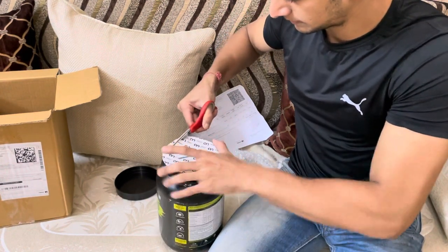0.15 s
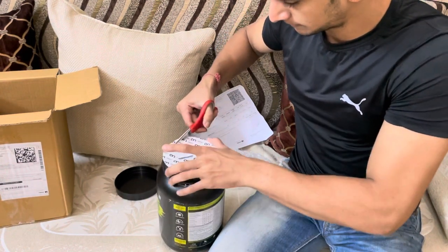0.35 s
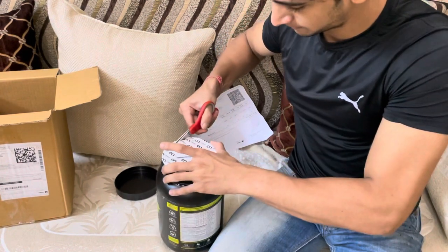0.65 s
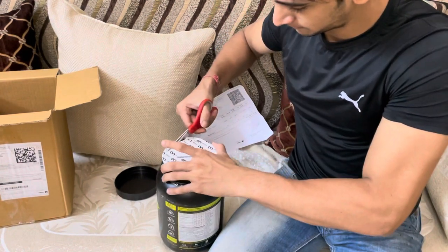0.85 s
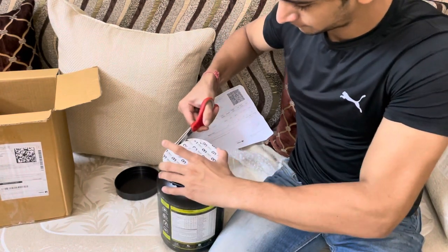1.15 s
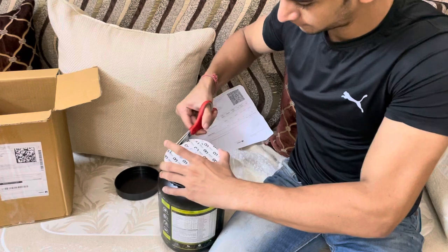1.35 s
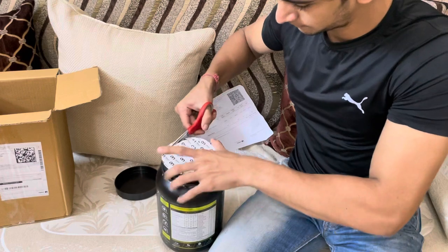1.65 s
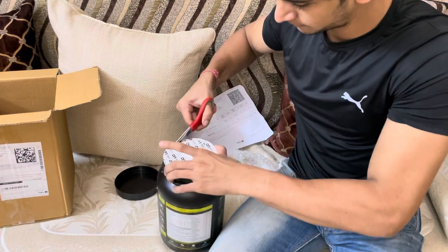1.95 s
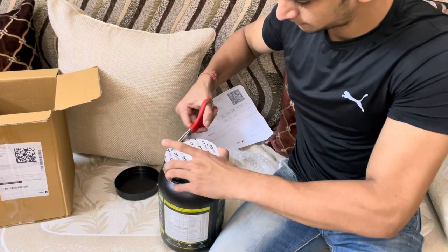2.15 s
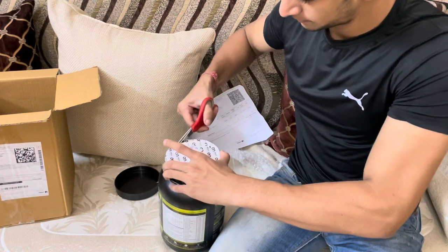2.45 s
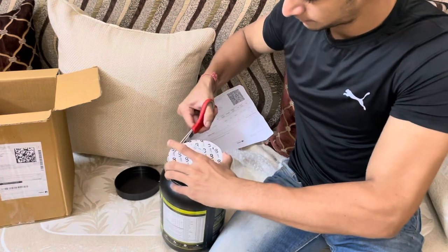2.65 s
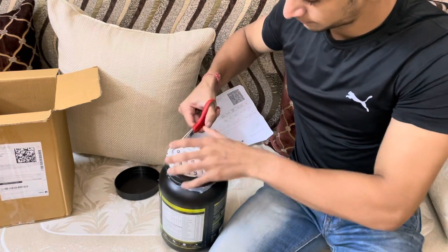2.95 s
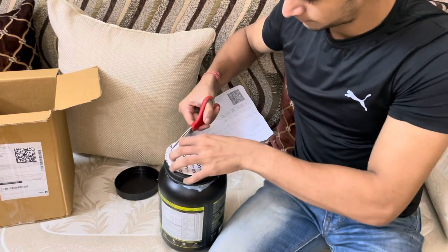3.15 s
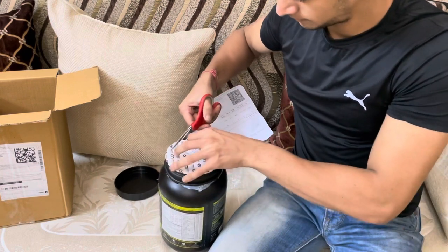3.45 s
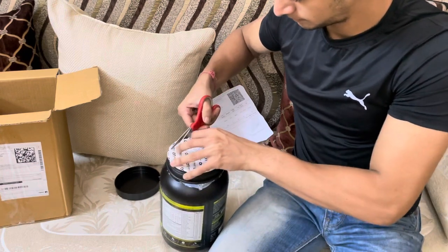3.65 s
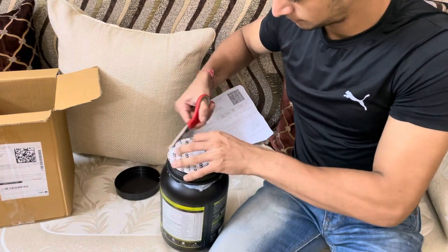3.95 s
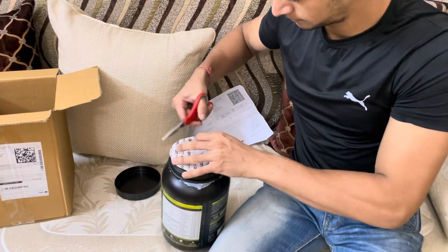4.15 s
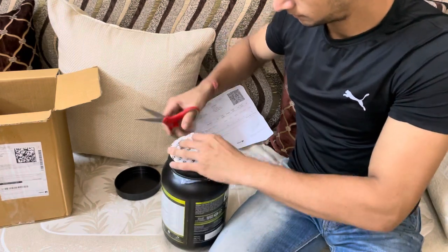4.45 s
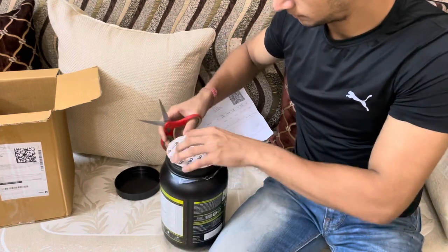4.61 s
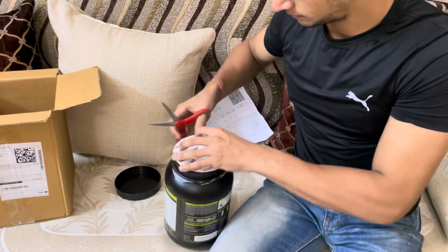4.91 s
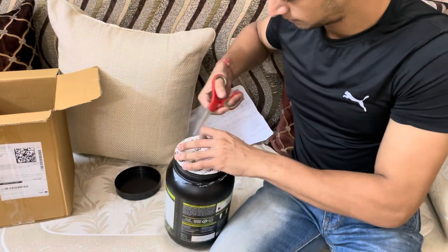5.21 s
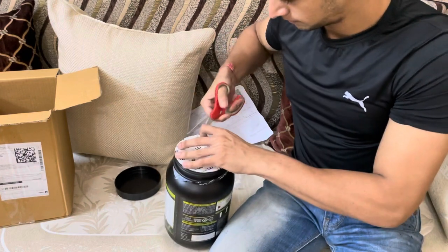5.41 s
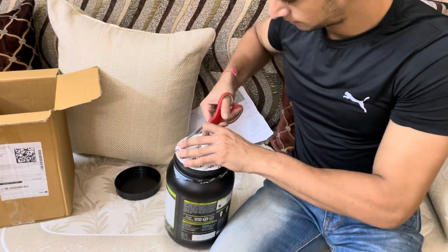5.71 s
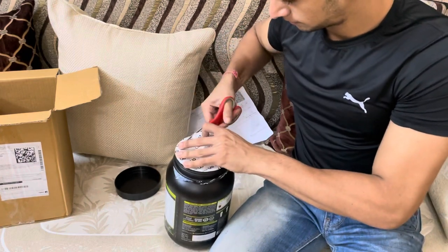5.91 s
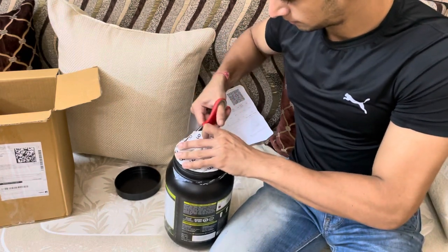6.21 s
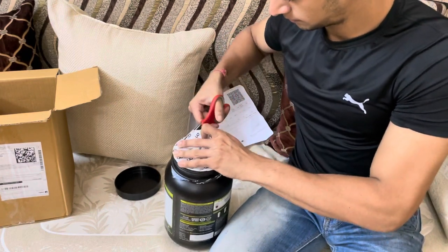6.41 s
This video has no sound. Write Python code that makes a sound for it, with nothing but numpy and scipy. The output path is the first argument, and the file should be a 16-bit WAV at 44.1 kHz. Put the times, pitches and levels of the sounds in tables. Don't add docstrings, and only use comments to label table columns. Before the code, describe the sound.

Close up, scissors work around the foil seal of a hollow plastic tub. Thin crinkles and dry rustles come in uneven bursts, with taut, drum-like bumps beneath. Two crisp snips fall around two and a half seconds, then metal blades click. Near four seconds the seal gives a loud hollow pop. Lighter scraping follows, then sharp snaps near the end. Quiet living room, faint traffic rumble, handheld stereo microphone.

```python
import sys
import numpy as np
from scipy import signal
from scipy.fft import rfft, irfft, next_fast_len
from scipy.io import wavfile
from scipy.ndimage import uniform_filter1d

SR = 44100
rng = np.random.default_rng(int(sys.argv[2]) if len(sys.argv) > 2 else 0)


def wav_record(signal):
    frames = np.transpose(np.atleast_2d(signal))
    bounded = np.clip(frames, -1, 1)
    quanta = np.round(bounded * 32767).astype(np.int16)
    wavfile.write(sys.argv[1], SR, quanta)


def volts_from_decibels(level):
    exponent = np.asarray(level, float) / 20
    return 10 ** exponent


N = 289737
SIZE = next_fast_len(N + SR)
HZ = np.arange(SIZE // 2 + 1) * SR / SIZE

# start in [s], peak in [dB],
# rim answer in [dB re peak], pitch as [ratio to kind].
CREASE_SNAPS = [(0.0836, -39, 11, 1.02), (0.223, -40, 7.5, 1.02), (0.3635, -31, 2, 1.02),
                (0.823, -39.5, 4, 1.02), (1.229, -38.5, 5, 1.02), (1.458, -45.5, -23, 1.02),
                (1.8489, -27.5, 4, 1.02), (2.073, -45, -6, 1.02), (2.2317, -39, 9, 1.02),
                (2.4344, -29, -7, 1.02), (2.6294, -49, -14, 1.02), (2.749, -38, -24, 1.02),
                (2.821, -39, 11, 1.05), (2.865, -34, -10, 1.08), (2.874, -45, 14, 1.02),
                (2.9985, -45, -21, 1.02), (2.677, -47.5, 7, 1.02), (2.696, -50, 3, 1.02),
                (2.717, -55, -12.5, 1.1), (3.097, -49.5, -6, 1.02), (3.8262, -54, -14.5, 1.02),
                (3.876, -41, -4, 1.02), (3.8938, -24.5, -35.5, 1.08), (3.8965, -24, -1, 1.12),
                (4.4466, -54, -25, 1.02), (4.7146, -42, -23, 1.02), (4.852, -32, -35, 1.02),
                (5.2105, -50, 8, 1.02), (5.635, -36.5, -17, 1.02), (5.784, -33, 14, 1.02),
                (6.204, -17.5, 4, 1.02), (6.2072, -27, 8.5, 1.02), (6.2005, -39, 6, 1.02)]
# start in [s], peak in [dB],
# rim answer in [dB re peak], pitch as [ratio to kind].
FOLD_SNAPS = [(0.3837, -46, 5, .8), (0.4564, -43, 5, .7), (0.5405, -44, 17, .8), (0.5927, -47, 5, .8),
              (0.5989, -44, 8, .8), (0.6084, -30, -6, 1.05), (0.966, -29, 2, 1.05), (0.972, -34, 8, 1.05),
              (1.0065, -50, 8, .6), (1.258, -39, 7, .8), (1.3542, -33.5, 5.5, 1.05),
              (1.5339, -28, -11, 1.15), (2.0965, -53, 5, 1.05), (2.569, -43.5, -10, 1.2),
              (2.8675, -42, 12, .7), (2.9987, -43, 2, 1.2), (3.0439, -48, 6, .7), (3.1569, -48, 14, 1.05),
              (3.5666, -57, -4, 1.05), (3.582, -32, -8, 1.05), (3.593, -49, 1, 1.05),
              (3.6177, -34, 9, 1.05), (3.88, -39, 13, .8), (4.464, -42, 13, 1.05), (4.49, -52, 14, .6),
              (4.574, -55, 18, .6), (4.7, -53.5, 12, .6), (5.3611, -44.5, 17.5, .7), (5.418, -55, 5, 1.05),
              (5.661, -50, 22, .55), (6.038, -35, -16, 1.05), (6.1434, -45, -5, 1.05),
              (6.151, -26, 8, 1.05), (6.4317, -60, 10, 1.05)]
# start in [s], peak in [dB],
# rim answer in [dB re peak], pitch as [ratio to kind].
CUT_SNAPS = [(0.398, -30, -12, .9), (1.0014, -56, -10, .9), (1.183, -47, -18, 1.05),
             (1.338, -54, -12, 1.05), (2.7394, -23, -5, .68), (2.8645, -39, -11, .9),
             (2.977, -49, -25, 1.3), (2.989, -49, -25, 1.3), (3.5302, -41, 12, 1.05),
             (3.8989, -18.5, -22, .95), (5.7878, -23.5, -16, 1.05), (5.7894, -20.5, 7, 1.05),
             (5.8134, -46, -15, 1.05), (2.7425, -36, -7, .7), (2.87, -34, -5, .7)]
# start in [s], peak in [dB],
# rim answer in [dB re peak], pitch as [ratio to kind].
SNIP_SNAPS = [
    (2.4303, -16, -13, 1.02),
    (2.7386, -20.5, -19, 1.05),
]
# frequency in [Hz], density in [dB per Hz].
FOIL_SPECTRUM = [(3000, -14), (4700, -2), (6000, -6), (8000, -2.5), (10000, 0), (12000, -.5), (13200, -7),
                 (14500, -18), (16000, -21)]
# frequency in [Hz], density in [dB per Hz].
RIM_SPECTRUM = [(500, 1), (1000, -4.5), (1500, 3.5), (2400, 2.5), (3500, 0), (4300, 1), (6500, -17)]
# firmest contact in [s], foil level in [dB],
# rim level in [dB re foil], hollow body level in [dB re foil], fade time in [s].
RUB_STROKES = [(0.0, -60.5, 0, -27, 0.11), (0.1, -75.5, 6, 18.5, 0.2), (0.3, -64.5, -5, -7, 0.44),
               (0.45, -66, 7, 10, 0.076), (0.992, -61.5, 0.5, 2, 0.3), (1.32, -83, 16, 24.5, 0.071),
               (1.62, -70, 0, -27, 0.22), (1.9, -64, -1.5, 4.5, 0.34), (2.101, -78.5, 0, 35.5, 0.055),
               (2.232, -64.5, 2.5, 2.5, 0.18), (2.689, -66.5, -0.5, 2, 0.36), (2.84, -69.5, -9, 11.5, 0.11),
               (3.24, -66, 3, -1, 0.047), (3.42, -79, -11, -24, 0.24), (3.923, -61, 1, 22.5, 0.15),
               (4.249, -63, 0.5, -3.5, 0.41), (4.67, -74, 2.5, 9, 0.32), (4.865, -69, -3, -9, 0.21),
               (5.428, -84.5, 10, 27.5, 0.081), (5.62, -86, 6, -5, 0.12), (6.02, -65, 2, 9, 0.24),
               (6.17, -87, 4, 17, 0.086), (6.461, -64, 4.5, 4.5, 0.33)]
# centre in [s], bright level in [dB],
# dull level in [dB], body level in [dB], half length in [s].
FOLD_CRUNCHES = [(0.1, -66, -66, -85, 0.029), (0.395, -49, -53, -53.5, 0.029),
                 (0.544, -51.5, -46.5, -43, 0.005), (0.602, -49, -46.5, -77, 0.018),
                 (0.844, -60, -54, -49.5, 0.028), (1.008, -53, -48, -54, 0.0045),
                 (1.039, -64, -59, -56, 0.03), (4.663, -76, -68, -58, 0.047), (5.15, -74, -77, -80, 0.064),
                 (1.271, -53.5, -50, -45, 0.021), (1.525, -57.5, -67, -69, 0.033),
                 (2.1, -56.5, -52, -70, 0.024), (2.494, -60, -54, -45, 0.029),
                 (2.782, -55, -69, -76, 0.028), (2.869, -54, -56, -61, 0.005),
                 (3.187, -71.5, -65, -61, 0.036), (3.595, -51, -49.5, -42, 0.024),
                 (3.898, -34.5, -31.5, -27, 0.0029), (4.476, -63, -63.5, -49, 0.017),
                 (4.593, -71, -72, -66, 0.041), (4.912, -67, -63.5, -73, 0.068),
                 (3.931, -55, -49, -46, 0.032), (0.453, -72, -61, -59.5, 0.028),
                 (5.83, -61, -51, -52.5, 0.032), (1.56, -73, -67, -67, 0.031),
                 (5.463, -80, -69, -58, 0.016), (4.706, -70, -68.5, -60, 0.0072),
                 (5.234, -69.5, -75, -89, 0.022), (5.424, -56.5, -59, -47, 0.017),
                 (5.632, -66, -63, -65.5, 0.064), (5.79, -41, -39.5, -46, 0.0054),
                 (6.054, -80, -63.5, -48.5, 0.029), (6.149, -53, -49.5, -49, 0.0086),
                 (6.209, -52, -50.5, -58, 0.039)]
# frequency in [Hz], width in [Hz], level in [dB].
TUB_MODES = [(310, 85, 1.5), (468, 37, -3), (487.5, 45.6, -3), (690, 104, -7.5), (783, 103, -11),
             (960, 54, -14), (1092, 62, -15.5), (1567, 33, -17.5)]
# start in [s], peak in [dB], pitch in [Hz],
# knock on the tub in [dB re peak], t60 in [s].
SEAL_TUGS = [(0.129, -40.5, 266, 5, 0.02), (0.5476, -32.5, 310, 0.5, 0.026), (0.603, -31, 298, -12, 0.1),
             (0.841, -37.5, 298, -19, 0.047), (1.008, -23.5, 267, -14, 0.028),
             (1.2715, -35.5, 285, 0, 0.067), (1.855, -38, 266, -4, 0.025), (2.105, -39.5, 246, -33, 0.18),
             (2.238, -37.5, 314.5, -4.5, 0.12), (2.481, -23.5, 310, -12, 0.048),
             (2.509, -26, 273, -9, 0.053), (3.155, -40, 282, 3.5, 0.036), (3.586, -39, 228, 0, 0.13),
             (3.917, -39, 297, -18, 0.11), (4.465, -34, 359, -15, 0.02), (4.577, -36, 215, -9, 0.019),
             (4.682, -37.5, 362, -21, 0.077), (4.702, -40, 341, -23, 0.069), (4.629, -45, 333, -15, 0.14),
             (5.361, -47, 296, 5.5, 0.36), (5.398, -33.5, 310, -4, 0.024), (5.661, -35.5, 280, -4.5, 0.019),
             (5.794, -41, 288, 2, 0.02), (6.039, -46, 415, 8, 0.055), (6.153, -40.5, 310, -2, 0.014),
             (6.203, -35.5, 355, 4.5, 0.018), (1.2592, -27.5, 296, -12, 0.045),
             (1.033, -39.5, 268, -6, .08), (2.468, -33.5, 297, -12, 0.11), (2.504, -33.5, 298, -4, 0.04),
             (5.39, -37, 292, -14, .03), (5.411, -39.5, 333, 6.5, 0.073)]
# start in [s], peak in [dB].
CUSHION_THUDS = [(0.549, -44), (0.598, -51), (0.841, -48), (1.01, -47.5), (1.27, -44.5), (2.103, -48.5),
                 (2.24, -51), (2.481, -48), (2.51, -49), (3.153, -68), (3.531, -63), (3.897, -39.5),
                 (5.792, -53.5)]
# start in [s], pitch in [Hz], peak in [dB], swell time in [s].
SEAL_SWINGS = [
    (0.5483, 303, -16.5, 0.0061),
    (1.2703, 296, -29, .01),
    (5.7901, 296, -21.5, 0.0084),
    (6.1522, 307, -30.5, 0.0054),
    (6.2045, 333, -37, 0.0034),
    (2.519, 290, -34.5, 0.0062),
    (2.4895, 324, -32, 0.0052),
]
# start in [s], pitch in [Hz], peak in [dB], t60 in [s].
POP_MODES = [
    (3.8964, 645, -11.5, .021),
    (3.8975, 312, -9, .035),
    (3.8995, 430, -19, .022),
    (3.8985, 1090, -24, .016),
    (3.8955, 1637, -29, .012),
    (3.8955, 2250, -30, .01),
    (3.8955, 520, -19, .012),
    (3.897, 850, -25, .014),
]
# start in [s], pitch in [Hz], peak in [dB], t60 in [s].
RIM_TAPS = [(3.0445, 544, -48.5, 0.017), (3.0445, 1210, -47.5, 0.01), (3.567, 1400, -44.5, 0.017),
            (6.5, 720, -52, 0.014), (2.49, 630, -44, 0.038), (5.7925, 2320, -30, 0.011),
            (5.792, 467, -27.5, 0.013), (5.787, 2600, -37, 0.0045), (5.799, 2360, -40, 0.011),
            (5.801, 1570, -45, .015), (0.0822, 1400, -45.5, .008), (0.084, 2550, -48, 0.0065),
            (2.0975, 1580, -39.5, 0.0085), (1.2572, 1780, -36, 0.0043), (1.1, 3300, -46, 0.0028),
            (2.8, 1600, -44, .012), (2.8, 1500, -46, 0.0072), (2.7, 581, -40, 0.01),
            (0.5478, 630, -29.5, 0.0094), (5.7915, 640, -34, .008), (3.912, 1090, -37, 0.055),
            (5.418, 790, -39, 0.025), (6.045, 900, -49.5, 0.026), (0.459, 1970, -42, 0.0085),
            (2.821, 1900, -56, .008), (6.2065, 2600, -33, 0.0055), (4.64, 1500, -58, .03),
            (4.572, 1330, -48.5, 0.012), (4.698, 1200, -55, .015)]
# frequency in [Hz], level in [dB], t60 in [s].
BLADE_MODES = [(1090, -19, 5.0), (1640, 4.5, 0.49), (2340, 3, 5.0), (2400, -2.5, 0.13), (2820, -10, 0.61),
               (3240, -2, 0.13)]
# start in [s], peak in [dB].
BLADE_CLACKS = [
    (2.822, -47),
    (3.0446, -49),
    (3.1541, -35),
    (3.1569, -30),
    (3.166, -44),
    (6.1509, -31.5),
]
# frequency in [Hz], t60 in [s].
ECHO_T60 = [(100, 0.47), (300, 0.31), (1000, 0.31), (4000, 0.32), (12000, 0.24)]
# frequency in [Hz], level in [dB].
ECHO_LEVEL = [(100, 5.5), (210, 4), (300, -7.5), (450, 3.5), (700, 2.5), (1500, 4), (2450, 1), (3500, 4),
              (12000, -2.5)]
# frequency in [Hz], likeness of diffuse sound in [0-1],
# left lead in [radians], left-right balance in [dB].
MIC_PORTS = [(0, .99, 0, .7), (80, .9, 0, 1.9), (350, .75, .15, 2.6), (550, .4, .1, 5.5),
             (800, .2, -.2, 4.5), (1500, .3, .1, 2.5), (2400, .6, .6, 2.5), (3200, .55, 1.3, 3.5),
             (5200, .3, 1.1, 5.5), (5700, .2, -.9, 3.5), (7000, .4, -1.9, 3.5), (7700, .88, -2.75, .6),
             (8500, .93, -3.14, 0), (9400, .88, -3.55, -.2), (11000, .62, -4.55, -.6),
             (12700, .85, -5.8, -.6), (16000, .94, -6.28, 0)]
# frequency in [Hz], level in [dB rms], left lead in [radians],
# left-right balance in [dB].
WHINE_TONES = [(1698.5, -67, -1.8, -1.2), (8495, -80, np.pi, 0)]
# time in [s], level in [dB].
TRAFFIC_SWELL = [(0.0, -54), (0.86, -55.5), (1.9, -56.5), (2.1, -52.5), (2.87, -57.5), (3.15, -54),
                 (3.92, -55), (4.32, -56.5), (4.83, -53.5), (5.2, -56), (5.95, -54.5), (6.57, -54)]
# frequency in [Hz], density in [dB per Hz].
RUMBLE_SPECTRUM = [(24, -41.5), (40, 0.5), (80, 2), (220, -6.5), (377, -20.5), (737, -29), (1300, -42.5),
                   (1690, -93.5), (2860, -120)]
# frequency in [Hz], density in [dB per Hz].
HISS_SPECTRUM = [(500, -7), (1200, 6), (2400, 4), (4000, -3.5), (5600, -18), (8000, 6.5), (12000, -3),
                 (13500, -21.5), (15000, -49)]

CREASE_HZ, CREASE_FLIP_S, CREASE_CRACK = 10030, 0.0018, 0.13
FOLD_HZ, FOLD_FLIP_S, FOLD_CRACK = 3180, 0.00084, 1
CUT_HZ, CUT_FLIP_S, CUT_CRACK = 6900, 0.0014, 0.34
SNIP_HZ, SNIP_FLIP_S, SNIP_CRACK = 11500, 0.0005, 0.4
STROKE_FADE_DB, STROKE_RISE_SHARE = 22.5, 0.33
TUG_RISE_S, WALL_HZ = 0.006, 630
CUSHION_HZ, CUSHION_T60_S = 130, 0.24
SWING_SHARPNESS, SLACK_CYCLES, SLACK_S = 2.2, 0.28, 0.0015
POP_RISE_CYCLES = 0.8
POP_DAMPING = 1.63
FIRST_ECHO_S = 0.0032
BOUNCE_S, BOUNCE_DB, BOUNCE_FROM_HZ = 0.0006, -9, 3700
HISS_DB = -75.5


def rms_one(x):
    return x / np.sqrt(np.mean(x ** 2) + 1e-20)


def at_hz(points, hz):
    points = np.array(points)
    return np.interp(np.log(hz + 1), np.log(points[:, 0]), points[:, 1])


def colour(x, spectrum):
    size = 8192
    level_db = at_hz(spectrum, np.arange(size // 2 + 1) * SR / size)
    cepstrum = irfft(np.log(volts_from_decibels(level_db)), size)
    cepstrum[1:size // 2] *= 2
    cepstrum[size // 2 + 1:] = 0
    pulse = irfft(np.exp(rfft(cepstrum)), size)
    return signal.fftconvolve(x, pulse / np.sqrt(np.sum(pulse ** 2)))[:N]


def resonate(x, modes):
    out = 0
    for k, (hz, width, db) in enumerate(modes):
        r = np.exp(-np.pi * width / SR)
        poles = [1, -2 * r * np.cos(2 * np.pi * hz / SR), r * r]
        ring = signal.lfilter([1, 0, -1], poles, x) * (1 - r * r) / 2
        out = out + (-1) ** k * volts_from_decibels(db) * ring
    return out


def drift(rate):
    r = np.exp(-80 * np.pi * rate / SR)
    noise = rng.standard_normal(N // 40 + 2002)
    slow = signal.lfilter([1], [1, -2 * r, r * r], noise)[2000:]
    return np.interp(np.arange(N) / 40, np.arange(len(slow)), rms_one(slow - slow.mean()))


def snaps(after_s=0.019, after_db=-20, edge_db=5, width=0.8):
    t = np.arange(1500) / SR
    bright, dull = np.zeros((2, N + len(t)))
    kinds = (
        (CREASE_SNAPS, CREASE_HZ, CREASE_FLIP_S, CREASE_CRACK),
        (FOLD_SNAPS, FOLD_HZ, FOLD_FLIP_S, FOLD_CRACK),
        (CUT_SNAPS, CUT_HZ, CUT_FLIP_S, CUT_CRACK),
        (SNIP_SNAPS, SNIP_HZ, SNIP_FLIP_S, SNIP_CRACK))
    for rows, ring_hz, flip_s, crack in kinds:
        for s, db, rim_db, pitch in rows:
            at, hz = round(s * SR), min(ring_hz * pitch, 15000)
            chance = rng.standard_normal((2, len(t)))
            flutter = volts_from_decibels(after_db) * np.exp(-t / after_s)
            push = (np.exp(-t / max(flip_s, 0.0002)) + flutter) * chance
            push[:, 0] = volts_from_decibels(edge_db) * np.sign(chance[:, 0])
            ring = resonate(push[0], [(hz, width * hz, 0)])
            ring = resonate(ring, [(hz, width * hz, 7)])
            bright[at:at + len(t)] += volts_from_decibels(db - 15) * (crack * push[0] + ring)
            dull[at:at + len(t)] += volts_from_decibels(db + rim_db - 20) * push[1]
    return colour(bright, FOIL_SPECTRUM) + colour(dull, RIM_SPECTRUM)


def grains(per_s, spread_db, smooth):
    sizes = volts_from_decibels(spread_db * np.minimum(rng.exponential(1, N), 4)) * rng.choice([-1, 1], N)
    slips = rms_one(sizes * (rng.random(N) < per_s / SR))
    return rms_one(slips + smooth * rng.standard_normal(N))


def crackle(patchy_db=2.5, width=0.66):
    slips, dealt = grains(2500, spread_db=3.5, smooth=0), rng.integers(0, 10, N)
    out = 0
    for k, hz in enumerate(np.geomspace(700, 15000, num=10)):
        patch = rms_one(slips * (dealt == k)) + 0.8 * rng.standard_normal(N)
        out = out + volts_from_decibels(patchy_db * drift(14.5)) * resonate(patch, [(hz, width * hz, 0)])
    return rms_one(out)


def effort():
    gains, t = np.zeros((3, N)), np.arange(N) / SR
    for s, db, rim_db, body_db, fade_s in RUB_STROKES:
        near = slice(max(round((s - 0.5) * SR), 0), round((s + 0.5) * SR))
        away = np.maximum(t[near] - s, (s - t[near]) / STROKE_RISE_SHARE) / fade_s
        gains[:, near] += volts_from_decibels(db + np.array([[0], [rim_db], [body_db]]) - STROKE_FADE_DB * away)
    for s, *levels_db, half_s in FOLD_CRUNCHES:
        near = slice(max(round((s - 0.2) * SR), 0), round((s + 0.16) * SR))
        swell = np.exp(-((t[near] - s) / half_s) ** 2)
        gains[:, near] += volts_from_decibels(np.array(levels_db))[:, None] * swell
    return gains


def rub():
    slips = crackle()
    bright = rms_one(colour(slips, FOIL_SPECTRUM))
    dull = rms_one(colour(slips, RIM_SPECTRUM))
    body = rms_one(resonate(grains(400, spread_db=4.5, smooth=0.86), TUB_MODES))
    grip = volts_from_decibels(2.2 * drift(30))
    return grip * np.sum(effort() * [bright, dull, body], axis=0)


def tugs(wobble=0.032, knock_s=0.0061, lopsided=0.26, wall_db=-1, wall_t60_s=0.038):
    t = np.arange(SR // 4) / SR
    out, knocks = np.zeros((2, N + len(t)))
    tension = 1 + wobble * np.append(drift(50), np.zeros(len(t)))
    thud = np.sin(2 * np.pi * CUSHION_HZ * t) * np.minimum(t / 0.0044, 1) * volts_from_decibels(-60 * t / CUSHION_T60_S)
    wall = volts_from_decibels(wall_db - 60 * t / wall_t60_s) * np.sin(2 * np.pi * WALL_HZ * t)
    rise = np.sin(np.pi / 2 * np.minimum(t / TUG_RISE_S, 1))
    for s, db, hz, knock_db, t60 in SEAL_TUGS:
        at = round(s * SR)
        turn = 2 * np.pi * hz * np.cumsum(tension[at:at + len(t)]) / SR
        swell = rise * volts_from_decibels(-60 * np.maximum(t - TUG_RISE_S, 0) / t60)
        out[at:at + len(t)] += volts_from_decibels(db - 2.5) * swell * (np.sin(turn) + volts_from_decibels(knock_db) * wall)
        scrape = rng.standard_normal(len(t)) * np.exp(-t / knock_s)
        knocks[at:at + len(t)] += volts_from_decibels(db + knock_db + 3.5) * scrape
        knocks[at] += volts_from_decibels(db + knock_db + 39)
    for s, db in CUSHION_THUDS:
        at = round(s * SR)
        out[at:at + len(t)] += volts_from_decibels(db + 8) * thud
    out = out + lopsided * out ** 2
    return (out + resonate(knocks, TUB_MODES[1:]))[:N]


def swings():
    t, out = np.arange(SR // 10) / SR, np.zeros(N + SR)
    for s, hz, db, swell_s in SEAL_SWINGS:
        at = round(s * SR)
        turn = 2 * np.pi * (hz * t + SLACK_CYCLES * (1 - np.exp(-t / SLACK_S)))
        swell = t / swell_s * np.exp((1 - (t / swell_s) ** 2) / 2)
        out[at:at + len(t)] += volts_from_decibels(db) * swell ** SWING_SHARPNESS * np.sin(turn)
    return out[:N]


def pop():
    t, out = np.arange(SR // 4) / SR, np.zeros(N + SR)
    for s, hz, db, t60 in POP_MODES + RIM_TAPS:
        at = round(s * SR)
        decay = volts_from_decibels(db - 60 * (t / t60) ** POP_DAMPING)
        rise = 1 - np.exp(-t * hz / POP_RISE_CYCLES)
        out[at:at + len(t)] += decay * rise * np.sin(2 * np.pi * hz * t)
    return out[:N]


def blades():
    clicks = np.full(N, 1e-18)
    for s, db in BLADE_CLACKS:
        clicks[round(s * SR)] = volts_from_decibels(db - 10)
    clicks = signal.sosfilt(signal.butter(4, 3800, fs=SR, output="sos"), clicks)
    out = 0
    for hz, db, t60 in BLADE_MODES:
        r, w = volts_from_decibels(-60 / (min(t60, 0.014) * SR)), 2 * np.pi * hz / SR
        out = out + signal.lfilter([0, volts_from_decibels(db) * np.sin(w)], [1, -2 * r * np.cos(w), r * r], clicks)
    return out


def room(x):
    t, tails = np.arange(SR // 2) / SR, 0
    white = rng.standard_normal((2, len(t)))
    for low in 60 * 2 ** np.arange(8):
        octave = signal.butter(2, [low, 2 * low], "band", fs=SR, output="sos")
        decay = volts_from_decibels(-29 - 60 * t / at_hz(ECHO_T60, 1.1 * low))
        tails = tails + signal.sosfilt(octave, white) * decay
    start = np.clip(t / FIRST_ECHO_S - 1, 0, 1)
    tails = rfft(tails * start, SR)
    near, wide = [uniform_filter1d(abs(tails) ** 2, size=hz) for hz in (14, 400)]
    strength = volts_from_decibels(at_hz(ECHO_LEVEL, np.arange(SR // 2 + 1)))
    tails = irfft(tails * np.sqrt(wide / near) * strength, SR)[:, :len(t)]
    return rfft(x, SIZE) * rfft(tails * start, SIZE)


def ports(direct, diffuse):
    hz, *columns = np.transpose(MIC_PORTS)
    alike, lead, balance_db = [np.interp(HZ, hz, c) for c in columns]
    alike = np.clip(alike, 0, 1)
    delay = np.exp(-2j * np.pi * HZ * BOUNCE_S)
    bounce = volts_from_decibels(BOUNCE_DB) * HZ ** 2 / (HZ ** 2 + BOUNCE_FROM_HZ ** 2) * delay
    left = direct * (1 + bounce) + diffuse[0]
    right = direct * (1 - bounce) + alike * diffuse[0] + np.sqrt(1 - alike ** 2) * diffuse[1]
    left = left * volts_from_decibels(balance_db / 2)
    right = right * volts_from_decibels(-balance_db / 2) * np.exp(-1j * lead)
    return irfft([left, right], SIZE)[:, :N]


def whine():
    out, t = np.zeros((2, N)), np.arange(N) / SR
    for hz, db, lead, balance_db in WHINE_TONES:
        turn = 2 * np.pi * hz * t + 2.4 * drift(1)
        level = np.sqrt(2) * volts_from_decibels(db + 0.17 * drift(23))
        left = volts_from_decibels(balance_db / 2) * np.sin(turn + lead)
        right = volts_from_decibels(-balance_db / 2) * np.sin(turn)
        out += level * np.array([left, right])
    return out


def background():
    def draw(spectrum, db):
        return volts_from_decibels(db) * colour(rng.standard_normal(N + 8192), spectrum)

    s, db = np.transpose(TRAFFIC_SWELL)
    traffic_db = np.interp(np.arange(N) / SR, s, db) + 2
    hiss_db = HISS_DB + 2.5 + drift(1)
    sides = [draw(RUMBLE_SPECTRUM, traffic_db) + draw(HISS_SPECTRUM, hiss_db) for side in range(2)]
    return rfft(sides, SIZE)


def scene():
    tub = snaps() + rub() + tugs() + swings() + pop() + blades()
    return ports(rfft(tub, SIZE), room(tub) + background()) + whine()


def thin_out(x, top_db=-13, faint_db=-103, jump_db=7):
    hop, width, masked_db = 1024, 16, -8
    pair = np.array([x[0] + x[1], x[0] - x[1]]) / 2
    hz, _, bins = signal.stft(pair, SR, "cosine", 2 * hop, hop)
    power = (abs(bins[:, :hop]) ** 2).reshape(2, -1, width, bins.shape[-1]).mean(axis=2) + 1e-20
    centre = hz[width // 2:hop:width, None]
    loudest = power.max(axis=0)
    treble = loudest[(centre[:, 0] > 9600) & (centre[:, 0] < 12400)].mean(axis=0)
    weak = (power < loudest * volts_from_decibels(2 * masked_db)) & (centre > 7500)
    floor = np.maximum(treble * volts_from_decibels(2 * top_db), volts_from_decibels(2 * faint_db))
    weak |= (power < floor) & (centre > 13000)
    bins[:, :hop] *= np.repeat(~weak, width, axis=1)
    mid, side = signal.istft(bins, SR, "cosine", 2 * hop, hop)[1][:, :N]
    steps = uniform_filter1d(np.diff(x[0], prepend=0) ** 2, size=128)[::128] + 1e-20
    usual = uniform_filter1d(steps, size=8)[4:-4]
    jumps = np.flatnonzero(steps[8:] > volts_from_decibels(2 * jump_db) * usual) + 8
    sharp = np.zeros(N)
    sharp[jumps * 128] = 1
    kept = np.minimum(np.convolve(sharp, np.hanning(768) * 2)[256:N + 256], 1)
    return kept * x + (1 - kept) * np.array([mid + side, mid - side])


def low_pass(x):
    return signal.sosfilt(signal.butter(12, 16470, fs=SR, output="sos"), x)


def record(dry):
    x = signal.sosfilt(signal.butter(3, 36, "high", fs=SR, output="sos"), dry)
    x = signal.sosfilt(signal.cheby2(12, 60, 16500, fs=SR, output="sos"), x)
    return low_pass(thin_out(x))


dry = scene()
out = record(dry)
wav_record(out)
```